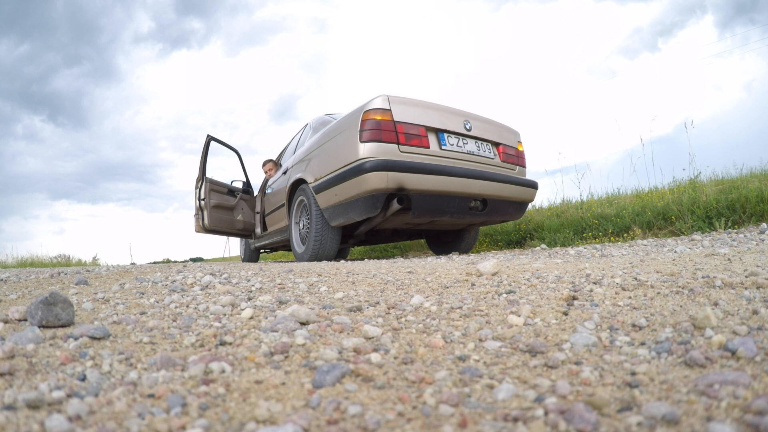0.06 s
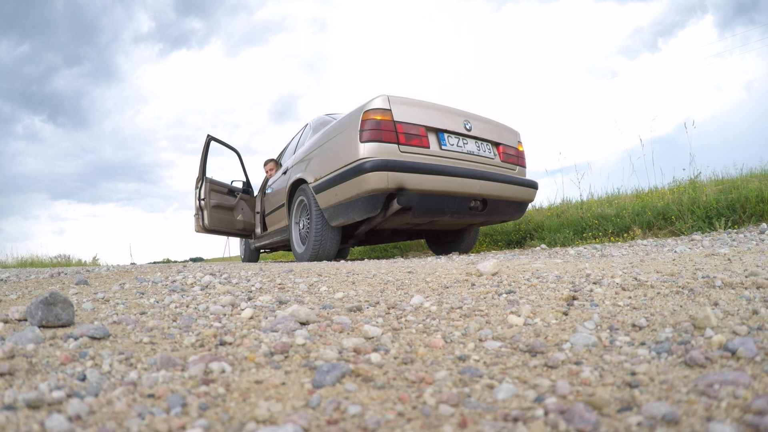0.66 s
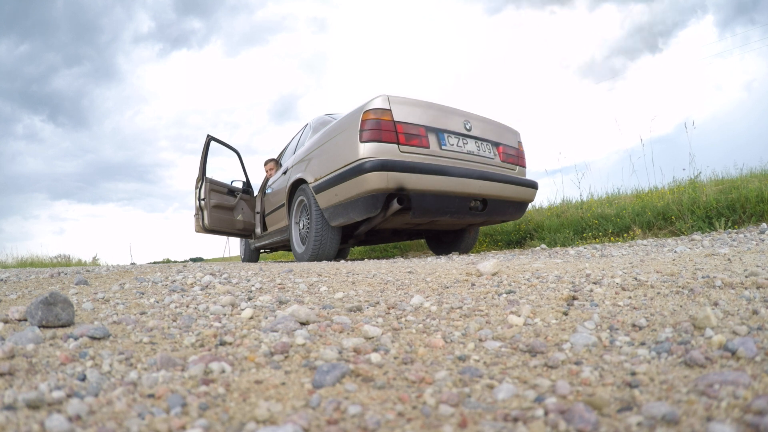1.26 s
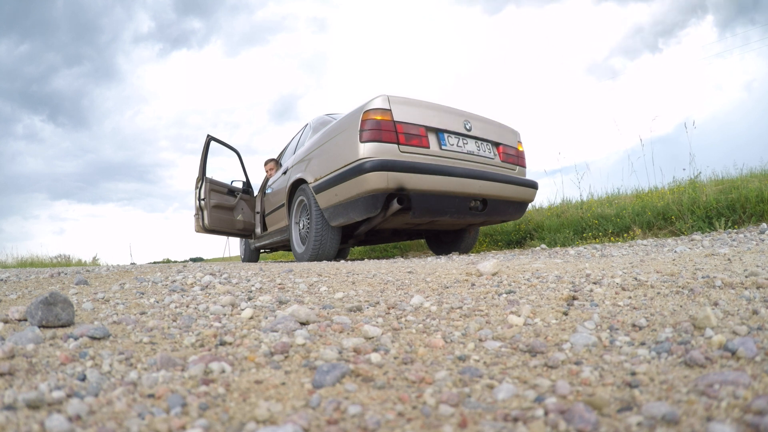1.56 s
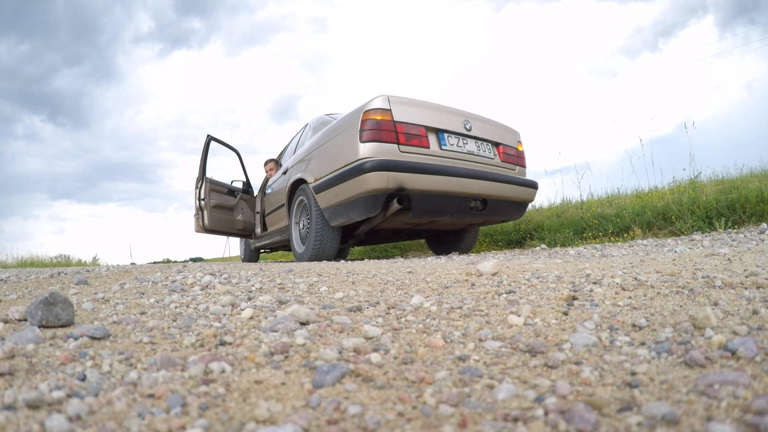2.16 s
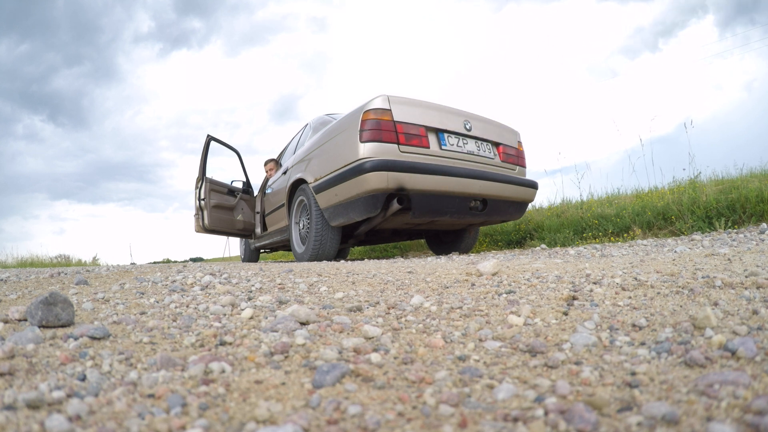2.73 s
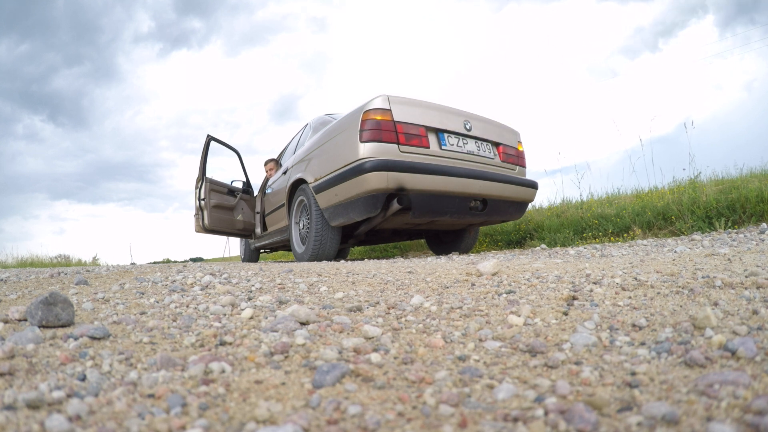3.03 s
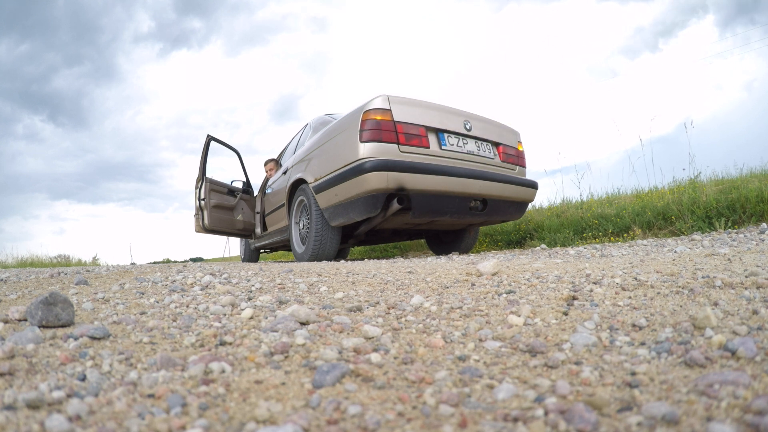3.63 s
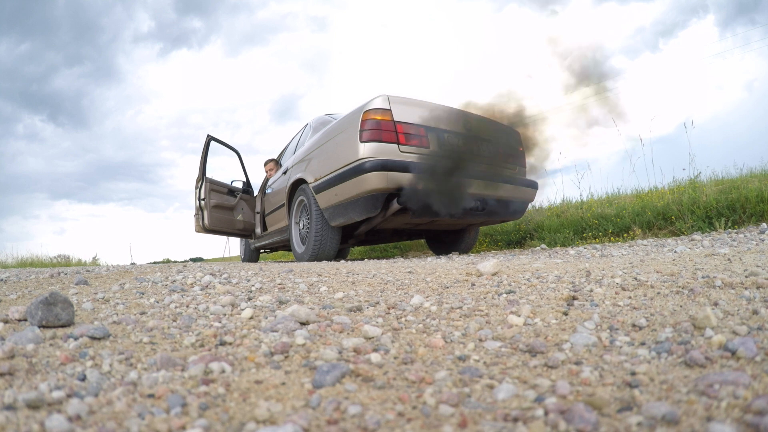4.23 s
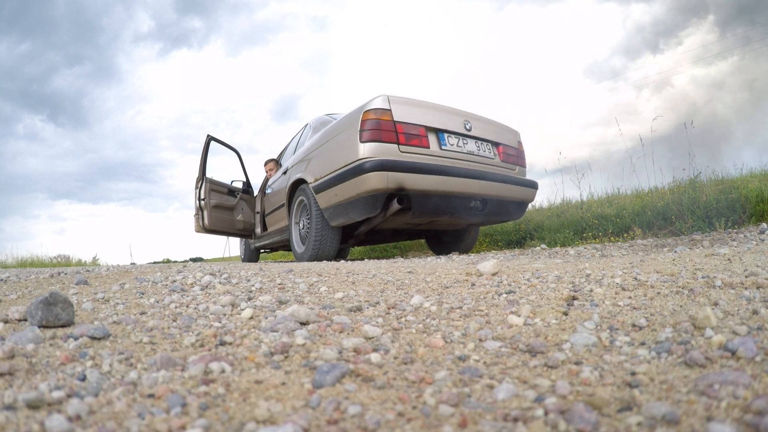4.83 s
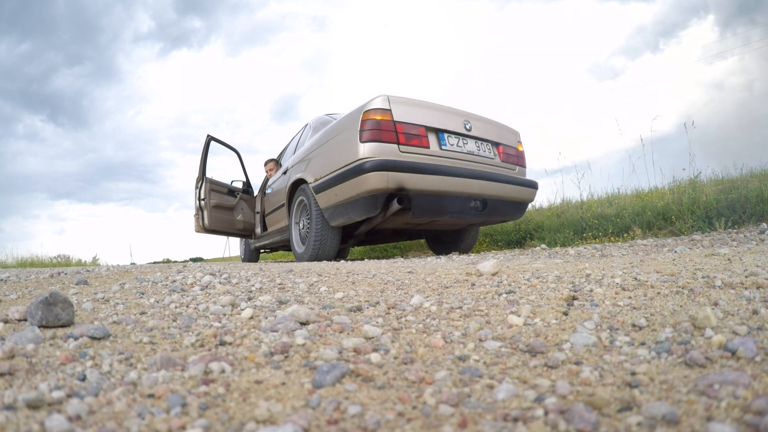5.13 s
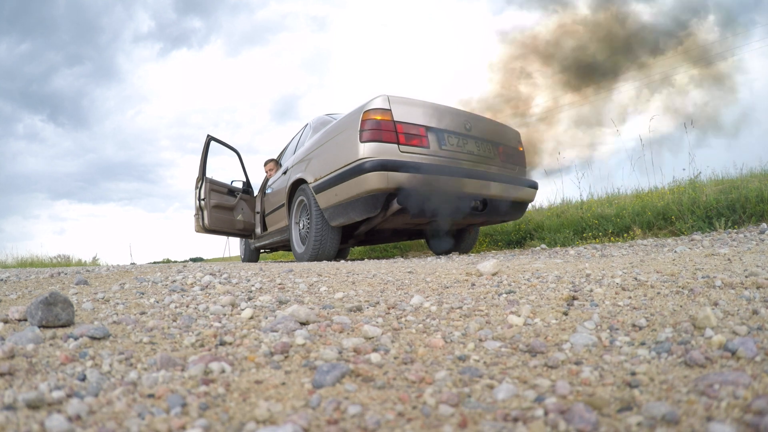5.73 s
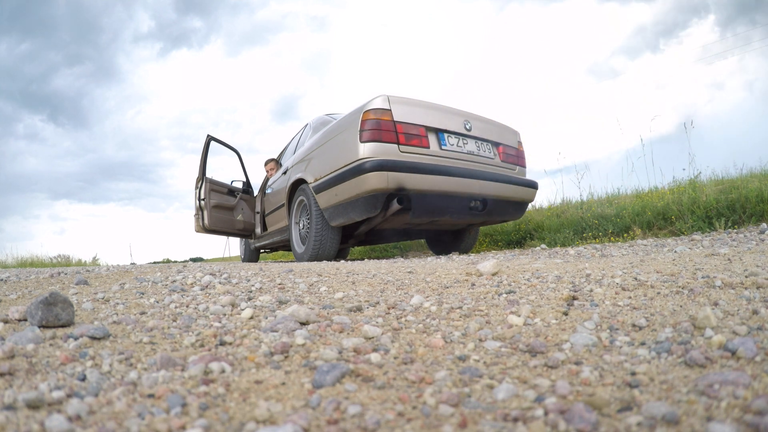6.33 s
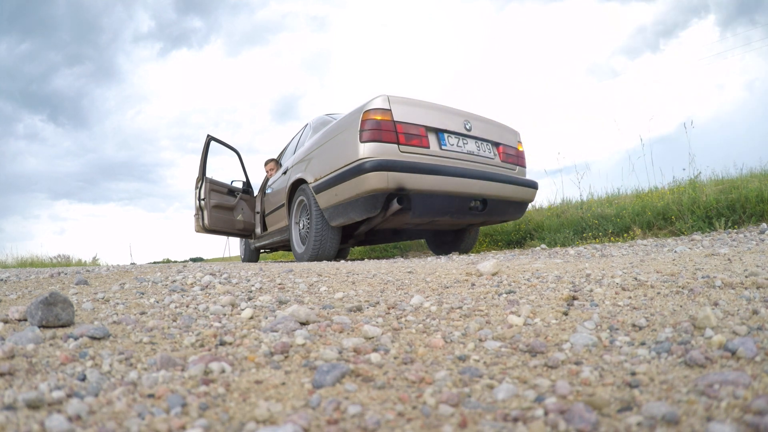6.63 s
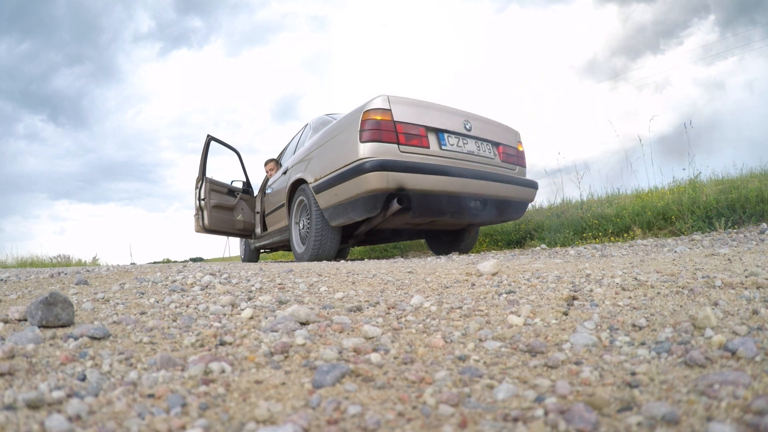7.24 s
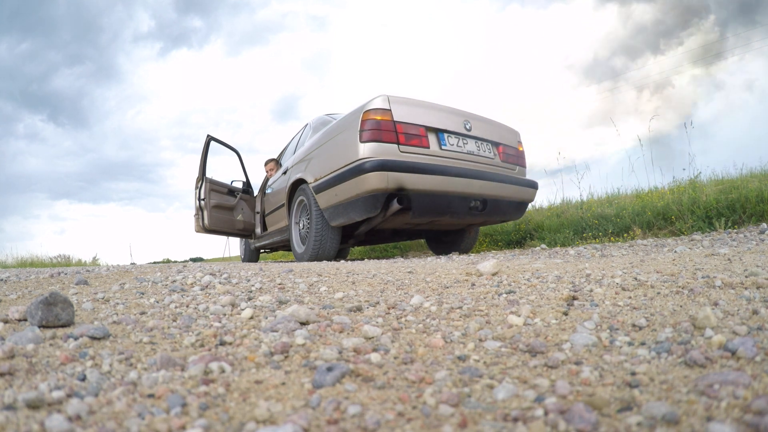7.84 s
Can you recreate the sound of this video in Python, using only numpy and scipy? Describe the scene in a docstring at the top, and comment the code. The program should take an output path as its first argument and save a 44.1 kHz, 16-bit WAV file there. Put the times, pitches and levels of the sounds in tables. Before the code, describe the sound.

A diesel car idles unevenly, then revs four times through an open exhaust with rough barks, ending in a loud backfire.

```python
"""A six-cylinder turbo diesel on a gravel track, heard from the ground behind its open tailpipe.
It idles slowly, each firing pushing out a slug of gas. At 0.5 s a throttle stab lifts it to a fast
idle, where the fuel drops out three times and two short kicks catch it. From 3.9 s it is blipped four
times: the firings bark under load; in between the pipe drones, gas rushes and the turbo whistles down.
At 7.8 s unburnt fuel backfires in the pipe and overloads the microphone."""
import sys
import numpy as np
from scipy import signal
from scipy.fft import rfft, irfft, next_fast_len
from scipy.io import wavfile
from scipy.ndimage import uniform_filter1d, map_coordinates

SR = 44100
rng = np.random.default_rng(int(sys.argv[2]) if len(sys.argv) > 2 else 0)


def dump(signal):
    """Clip the signal to [-1, 1] and save it as 16-bit WAV at the path in sys.argv[1]."""
    limited = np.clip(np.atleast_2d(signal).T, -1, 1)
    pcm = np.round(limited * 32767).astype(np.int16)
    wavfile.write(sys.argv[1], SR, pcm)


N = 356769
TIME = np.arange(N) / SR


# pipe weighting of the firing harmonics: f/Hz, level/dB
PIPE_RESPONSE = [(25, -26), (40, -2), (68, 5), (80, 4), (120, 5), (140, 0.5), (165, -3.5), (200, -17),
                 (240, -12), (285, -15), (330, -18.5), (420, -28.5), (700, -41)]

def exhaust_pulses(rate_hz, firings, lag=0.025, steepening_db=3.5, racing_db=1.0):
    """Each firing pushes out a slug of gas, then sucks back; revving steepens the pulse."""
    _, _, revving = regimes()
    angle = 2 * np.pi * (firings - .5 - lag)
    skew_rad = np.clip(rate_hz / 90 - .35, 0, 1)
    wave, power = 0, 0
    for k in range(1, 10):
        gain = from_db(at_hz(PIPE_RESPONSE, k * rate_hz) + (k > 1) * steepening_db * revving)
        wave = wave - gain * np.cos(k * angle + (k - 1) * skew_rad)
        power = power + gain ** 2 / 2
    radiation = from_db(racing_db * np.clip(rate_hz / 60 - 1, 0, 1))   # fast pulses radiate better
    strength = firing_strength(firings, imbalance=.4, scatter_db=.35)
    return pulse_pressure(rate_hz) * radiation * strength * wave / np.sqrt(power)


# pulses under load: firing rate/Hz, level/dB
LOADED_PULSES = [(45, -25), (62, -21.5), (80, -10.5), (108, -16), (125, -12.5), (145, -11.5)]
# fuel dropouts: t/s
FUEL_CUTS = [1.585, 2.68, 3.79]
# throttle kicks: t/s, pulse level/dB, rush dip/dB
KICKS = [(1.72, -15, 4), (2.83, -17, 3)]

def pulse_pressure(rate_hz, slow_db=-16, fast_db=-13, cut_db=21.5, dip_scale=1.6, kick_s=0.03):
    """Pulse strength follows the fuel: idling, starved, kicked or loaded."""
    slow, fast, _ = regimes()
    _, up_s, _, _, pulse_db, *_ = np.transpose(STABS)
    starved_db = cut_db * sum(step(t, 0.0066) * fade(t, 0.086) for t in FUEL_CUTS)
    held = step(up_s[0], kick_s) * from_db(fast_db - dip_scale * dip_db(recover_s=0.54) - starved_db)
    kicked = sum(from_db(db) * bell(t, kick_s) for t, db, _ in KICKS)
    loaded = from_db(at_hz(LOADED_PULSES, rate_hz)) * load(pulse_db, surge_db=6, release_s=0.035)
    return np.maximum(slow * from_db(slow_db) + fast * held + kicked, loaded)


# governed speed: t/s, firing rate/Hz
GOVERNOR = [(0, 41.04), (.46, 38.58), (.6, 64.6), (.69, 72.2), (1.25, 69.95), (1.7, 64.77), (1.77, 68.37),
            (2.45, 68), (2.81, 64.85), (2.88, 68.1), (3.62, 67.6), (3.91, 65.18), (5.4, 79.64)]
# throttle stabs: pedal down t/s, pedal up t/s, top firing rate/Hz, surge width/s,
# pulse level/dB, bark level/dB, crackle level/dB, rush dip/dB
STABS = [(0.486, 0.618, 68.3, 0.1, 5, -21, -38.5, 7.5), (3.928, 4.2799, 132.4, 0.06, -3.5, -20, -36.5, 3.5),
         (5.4161, 5.7472, 145.52, 0.068, -1, -19.5, -38.5, 3.5),
         (6.6644, 6.9085, 141.49, 0.061, -1, -19, -38.5, 3),
         (7.431, 7.6544, 157, 0.053, -1.5, -20.5, -39.5, 2.5)]

def firing_rate(climb_exponent=1.03, coast_s=1.9013):
    """Speed climbs while the pedal is down, then coasts until the governor catches it."""
    rate_hz = idle_hz = in_time(GOVERNOR)[0]
    for down, up, top_hz, *_ in STABS:
        start_hz = np.interp(down, TIME, rate_hz)
        progress = np.clip((TIME - down) / (up - down), 0, 1)
        climb_hz = start_hz + (top_hz - start_hz) * progress ** climb_exponent
        rate_hz = np.where(TIME > down, np.maximum(climb_hz * fade(up, coast_s), idle_hz), rate_hz)
    return rate_hz


def regimes():
    """Shares of slow idle (to the first stab), fast idle (to the second) and revving."""
    first, second = step(STABS[0][0], .02), step(STABS[1][0], .02)
    return 1 - first, first - second, second


def load(levels_db, surge_db, release_s, attack_s=0.0064, peak_s=0.074):
    """Gain under throttle; the first firings of a stab are the hardest."""
    gain = 0
    for (down, up, _, surge_s, *_), db in zip(STABS, levels_db):
        pedal = step(down, attack_s) * fade(up, release_s)
        gain = gain + pedal * from_db(db + surge_db * bell(down + peak_s, surge_s))
    return gain


def firing_strength(firings, imbalance, scatter_db):
    """Gain per firing: six unequal cylinders plus random scatter."""
    index = np.arange(1000)
    cylinders = np.array([0.67, -3.0, -0.7, 1.0, 0.57, -2.5])
    level_db = imbalance * cylinders[index % 6] + scatter_db * rng.standard_normal(len(index))
    return from_db(np.interp(firings, index + .5, level_db))


# bark, crackle and injector spectra: f/Hz, level/dB
BARK_SPECTRUM = [(90, -27.5), (200, 2.5), (280, -2.5), (400, -0.5), (550, 0.5), (1040, -2), (1600, -5.5),
                 (2800, -13), (4000, -22), (5500, -28.5), (9000, -63)]
CRACKLE_SPECTRUM = [(1500, -16), (3000, 0.5), (4000, -4), (5100, -11), (6300, -23.5), (8800, -32),
                    (11600, -35.5), (15500, -58)]
TICK_SPECTRUM = [(4000, -26.5), (7000, 2), (10000, -7.5), (13000, -8), (15500, -13.5)]

def bark(rate_hz, firings, lead_s=0.00471, idle_bark_db=-46, idle_crackle_db=-56):
    """Loaded firings tear the air at each pressure crest; at slow idle they clatter, injectors tick."""
    crest = firings + lead_s * rate_hz
    age = (crest % 1 - .5) / rate_hz * np.sqrt(rate_hz / 90)   # bursts shorten with speed
    tear = burst(age, 0.00083, 0.002)
    slow, _, _ = regimes()
    *_, bark_db, crackle_db, _ = np.transpose(STABS)
    bark_gain = load(bark_db, surge_db=4, release_s=0.016) + slow * from_db(idle_bark_db)
    crackle_gain = load(crackle_db, surge_db=9.5, release_s=0.016) + slow * from_db(idle_crackle_db)
    tick_gain = from_db(-67) * (40 / rate_hz) ** 4

    def uneven(shape, scatter_db):
        """Bursts of uneven strength, mean power 1."""
        shape = shape * firing_strength(crest, imbalance=0.07, scatter_db=scatter_db)
        return shape / np.sqrt(uniform_filter1d(shape ** 2, SR // 12))

    body = uneven(tear + 0.13, scatter_db=1.5) * noise(BARK_SPECTRUM)
    crackle = uneven(tear ** 0.52 + 0.041, scatter_db=6) * noise(CRACKLE_SPECTRUM, grain_db=6)
    ticks = uneven(tear + .1, scatter_db=0.5) * noise(TICK_SPECTRUM)
    return bark_gain * body + crackle_gain * crackle + tick_gain * ticks


# hard firings: t/s, crack level/dB, puff level/dB, treble snap level/dB
HARD_FIRINGS = [(0.4833, -6, -3, -30), (0.508, -8, -18, -22), (0.528, -20, -30, -19),
                (1.708, -14, -23, -35), (1.721, -3.5, -1, -16), (1.734, -14, -7.5, -25),
                (2.8189, -6.5, -1, -33), (2.832, -5.5, -12, -32), (3.916, -8, -4.5, -39),
                (3.932, -16, -3.5, -35), (3.959, -8.5, -4.5, -11.5), (4.035, -31, -27, -13),
                (5.361, -16, -24, -42), (5.4101, -17, -5, -40), (5.522, -16, -30, -21),
                (5.606, -14, -30, -34), (6.675, -20, -6.5, -39), (6.704, -5.5, -11, -27),
                (7.44, -23, -10, -40), (7.474, -6, -24, -14)]
# crack spectrum: f/Hz, level/dB
CRACK_SPECTRUM = [(100, -11), (300, 9.5), (1200, 8), (2800, -2), (4500, -15.5), (7000, -33.5),
                  (15000, -52)]

def hard_firings(rise_s=0.00071, decay_s=0.0014, tail_db=-13, tail_s=0.019, puff_s=0.0018):
    """As the fuel comes in, a crack with a rough tail rides on one push and pull of gas."""
    cracks, puffs, snaps = np.zeros((3, N))
    for t, crack_db, puff_db, snap_db in HARD_FIRINGS:
        near = np.abs(TIME - t) < .08
        age = TIME[near] - t
        hit = burst(age, rise_s, decay_s)
        tail = from_db(tail_db) * burst(age, rise_s, tail_s)
        cracks[near] += from_db(crack_db) * (hit + tail)
        snaps[near] += from_db(snap_db) * hit
        swing = age / puff_s - 1
        puffs[near] -= from_db(puff_db) * swing * np.exp((1 - swing ** 2) / 2)
    return puffs + snaps * noise(CRACKLE_SPECTRUM) + cracks * noise(CRACK_SPECTRUM)


BACKFIRE_S = 7.7985
# bang spectrum: f/Hz, level/dB
BANG_SPECTRUM = [(100, -14), (800, 12.5), (2000, 3.5), (3000, 7.5), (5000, -4.5), (8000, -34),
                 (10500, -24), (15000, -33)]

def backfire(shock_s=0.0012, snap_at_s=0.0057, push_at_s=0.0066, pull_at_s=0.0076):
    """Unburnt fuel goes off in the pipe: a crack, a pressure wave, a deep suck behind it."""
    age = TIME - BACKFIRE_S
    shock = from_db(12.5) * (age > 0) * np.exp(-np.abs(age) / shock_s)
    snap = from_db(3) * np.exp(-.5 * ((age - snap_at_s) / 0.00031) ** 2)
    crack = (shock + snap) * noise(BANG_SPECTRUM)
    push = from_db(4) * np.exp(-.5 * ((age - push_at_s) / 0.00078) ** 2)
    pull = from_db(7) * (age > pull_at_s) * np.exp(-np.abs(age - pull_at_s) / .008)
    wave = push - cut(pull, 320, "low")
    return crack + cut(wave, 30, "high")


# silencer response: f/Hz, level/dB
SILENCER = [(60, -14.5), (110, -0.5), (180, 0.5), (230, -1), (300, -8.5), (400, -11), (520, -11.5),
            (700, -1)]

def burble(rate_hz, firings, rush_db, offset_db=-3, waver_db=5, revving_db=-9.5):
    """Unequal cylinders add lines between the firing harmonics, shaped by the silencer."""
    _, _, revving = regimes()
    lines = 0
    for thirds in (4, 5, 7, 8, 10, 11, 13, 16, 20):
        order = thirds / 3
        line_db = at_hz(SILENCER, rate_hz * order) + waver_db * drift(7) - 5 * (thirds % 2)
        lines = lines + from_db(line_db) * np.sin(2 * np.pi * (firings * order + rng.random()))
    return from_db(rush_db + offset_db + revving_db * revving) * lines


# run-down drone: firing rate/Hz, then level/dB at 2/3, 1, 2 and 3 times that rate
DRONE_ORDERS = [(81, -33, -29.5, -23, -30), (88, -39, -38, -29, -30), (100, -32.5, -42, -50, -39),
                (112, -33.5, -32.5, -56, -40), (125.5, -39.5, -34, -59, -45), (145, -46, -46.5, -48, -54.5)]

def drone(rate_hz, firings, waver_db=2, dip_scale=0.3):
    """Throttle shut: engine orders swell and fade with engine speed as it runs down."""
    rates_hz, *levels_db = np.transpose(DRONE_ORDERS)
    _, _, revving = regimes()
    pedal = sum(step(down, 0.037) - step(up, 0.037) for down, up, *_ in STABS[1:])
    shut = np.clip(revving - pedal, 0, 1)
    tones = 0
    for order, curve_db in zip((2 / 3, 1, 2, 3), levels_db):
        level_db = np.interp(rate_hz, rates_hz, curve_db) + waver_db * drift(14)
        tones = tones + from_db(level_db) * np.sqrt(2) * np.sin(2 * np.pi * order * firings)
    return shut * from_db(-dip_scale * dip_db()) * tones


# rush, hiss and rumble spectra: f/Hz, level/dB
RUSH_SPECTRUM = [(60, -15), (130, 1), (200, -9.5), (300, 1.5), (400, -5.5), (520, -4.5), (700, -6.5),
                 (1040, -4), (1730, -8), (3030, -18.5), (4000, -37), (6000, -63.5)]
HISS_SPECTRUM = [(2000, -22.5), (3400, 0.5), (3900, -4.5), (4400, -4.5), (5400, -6.5), (6500, -13.5),
                 (7500, -21.5), (10000, -28), (13500, -35.5), (15500, -51.5)]
RUMBLE_SPECTRUM = [(10, -18), (25, 0.5), (60, -1.5), (130, -1.5), (200, -3), (280, -21.5), (600, -57)]

def gas_flow(firings, rush_db, throb_depth=0.082, flutter_db=1, lull_db=1.5, lull_s=0.074):
    """Gas rushes through the pipe, throbbing with the firings; the hiss lulls after each blip."""
    _, _, revving = regimes()
    lull = sum(bell(up + lull_s, lull_s) for _, up, *_ in STABS[1:])
    hiss_db = rush_db - 19.5 + 3 * revving - lull_db * lull
    throb = 1 + throb_depth * np.cos(2 * np.pi * (firings - .25))
    flutter = from_db(flutter_db * drift(90))
    rush = from_db(rush_db + 3) * through_pipe(noise(RUSH_SPECTRUM))
    hiss = from_db(hiss_db) * through_pipe(noise(HISS_SPECTRUM))
    rumble = from_db(rush_db - 10) * noise(RUMBLE_SPECTRUM)
    return throb * flutter * (rush + hiss) + rumble


# pipe resonances: f/Hz, width/Hz, lift/dB
PIPE_MODES = [(293.4, 27, 4.5), (535, 69, 8), (804, 8.5, 8), (998, 34, 6.5), (1436, 110, 2),
              (2275, 120, 3.5), (3064, 400, 5), (4370, 200, 6.5), (5420, 200, 4), (6100, 90, -2.5),
              (8130, 250, 0), (10100, 570, 2.5)]

def through_pipe(flow):
    """Pipe resonances colour the flow; rms 1."""
    for hz, width_hz, lift_db in PIPE_MODES:
        radius = np.exp(-np.pi * width_hz / SR)
        poles = [1, -2 * radius * np.cos(2 * np.pi * hz / SR), radius ** 2]
        band = signal.lfilter([1, 0, -1], poles, flow) * (1 - radius ** 2) / 2
        flow = flow + (from_db(lift_db) - 1) * band
    return rms_one(flow)


def rush_level_db(slow_db=-35, running_db=-27.5):
    """Base level of flow and burble: low at slow idle, then steady but for the dips."""
    slow, _, _ = regimes()
    return slow * slow_db + (1 - slow) * running_db - dip_db()


def dip_db(recover_s=0.73, backfire_dip_db=11.5):
    """The level sinks after each stab, kick and bang, then swells back."""
    dips = [(up, db) for _, up, *_, db in STABS] + [(t, db) for t, _, db in KICKS]
    dips.append((BACKFIRE_S, backfire_dip_db))
    return np.max([db * step(t, .015) * bell(t, recover_s) for t, db in dips], axis=0)


# whistle at idle: t/s, f/Hz, level/dB
IDLE_WHISTLE = [(0, 5540, -59), (.47, 4860, -62), (.58, 4960, -50), (.68, 6400, -61), (.9, 6740, -75),
                (1.2, 7030, -57), (1.66, 7080, -59.5), (1.8, 7370, -58), (2.05, 7240, -74),
                (2.76, 7150, -63), (2.92, 7500, -60), (3.2, 7300, -69), (3.93, 7140, -65)]
# spool-downs: start t/s, end t/s, start f/Hz, end f/Hz
SPOOL_DOWNS = [(4.35, 5.415, 14700, 10100), (6.15, 6.68, 15730, 12400), (7.3, 7.45, 15400, 14300)]
# whistle while spooling down: f/Hz, level/dB
SPOOL_WHISTLE = [(10200, -76), (12000, -70), (13000, -80), (15000, -84)]

def turbo(half_width_hz=130):
    """The turbine's breathy whistle follows its shaft: wandering at idle, falling between blips."""
    hz, idle_db = in_time(IDLE_WHISTLE)
    _, _, revving = regimes()
    gain = from_db(idle_db) * (1 - revving)
    for start, end, start_hz, end_hz in SPOOL_DOWNS:
        spooling = (TIME > start) & (TIME < end)
        hz = np.where(spooling, np.interp(TIME, [start, end], [start_hz, end_hz]), hz)
        gain = np.where(spooling, from_db(at_hz(SPOOL_WHISTLE, hz)), gain)
    angle = 2 * np.pi * np.cumsum(hz) / SR
    in_phase, quadrature = cut(rng.standard_normal((2, N)), half_width_hz, "low")
    return gain * rms_one(in_phase * np.cos(angle) + quadrature * np.sin(angle))


# airy hiss spectrum: f/Hz, level/dB
AIR_SPECTRUM = [(3000, -19), (5300, 5.5), (6800, -0.5), (7600, -13), (8200, -9), (9000, -14),
                (10100, -7.5), (11500, -23), (15500, -40)]

def coasting_air(level_db=-59, wait_s=.17, swell_s=.06):
    """Between blips an airy hiss swells and lasts until the pedal goes down again."""
    gate = sum(step(up + wait_s, swell_s) * (1 - step(next_down, swell_s))
               for (_, up, *_), (next_down, *_) in zip(STABS[1:], STABS[2:]))
    return from_db(level_db) * gate * noise(AIR_SPECTRUM)


def noise(spectrum, grain_db=0):
    """Turbulence of a given spectral shape, rms 1; grain makes it spiky."""
    size = next_fast_len(N, True)
    white = rng.standard_normal(size) * from_db(grain_db * np.clip(rng.standard_normal(size), -3, 3))
    hz = np.maximum(np.fft.rfftfreq(size, 1 / SR), 1)
    return rms_one(irfft(rfft(white) * from_db(at_hz(spectrum, hz)))[:N])


def drift(rate_hz):
    """Smooth random wander, rms 1."""
    points, coarse_s = rng.standard_normal(N // 100), TIME[::20]
    curve = map_coordinates(points, [coarse_s * rate_hz + 5], order=3, mode="wrap")
    return rms_one(np.interp(TIME, coarse_s, curve))


def burst(age, rise_s, decay_s):
    """Gaussian rise to age 0, exponential decay after."""
    return np.where(age < 0, np.exp(-.5 * (age / rise_s) ** 2), np.exp(-np.abs(age) / decay_s))


def step(t, rise_s):
    """Smooth 0 to 1 around t."""
    return .5 + .5 * np.tanh((TIME - t) / rise_s)


def bell(t, width_s):
    """Swell and fall around t."""
    return np.exp(-np.minimum(((TIME - t) / width_s) ** 2, 20))


def fade(t, decay_s):
    """1 until t, then decaying."""
    return np.exp(-np.clip((TIME - t) / decay_s, 0, 20))


def in_time(rows):
    """Table columns, sample by sample."""
    times, *columns = np.transpose(rows)
    return [np.interp(TIME, times, column) for column in columns]


def at_hz(spectrum, hz):
    """Level in dB, interpolated over log frequency."""
    points_hz, levels_db = np.transpose(spectrum)
    return np.interp(np.log(hz), np.log(points_hz), levels_db)


def cut(x, hz, kind):
    """Second-order low- or high-pass."""
    return signal.sosfilt(signal.butter(2, hz, kind, fs=SR, output="sos"), x + 1e-18)


def from_db(db):
    return 10 ** (np.asarray(db) / 20)


def rms_one(x):
    return x / np.sqrt(np.mean(x ** 2) + 1e-20)


def scene():
    """Engine, gas flow, turbo and backfire at one microphone."""
    rate_hz, rush_db = firing_rate(), rush_level_db()
    firings = np.cumsum(rate_hz) / SR   # running count
    tones = exhaust_pulses(rate_hz, firings) + burble(rate_hz, firings, rush_db) + drone(rate_hz, firings)
    engine = tones + bark(rate_hz, firings) + hard_firings()
    return (engine + gas_flow(firings, rush_db) + turbo() + backfire() + coasting_air())[None]


def record(dry, ceiling=0.98, cutoff_hz=15900):
    """The microphone flattens the biggest peaks; the top treble is cut."""
    clipped = dry / (1 + (dry / ceiling) ** 8) ** (1 / 8)
    return signal.sosfilt(signal.ellip(10, .1, 80, cutoff_hz, fs=SR, output="sos"), clipped)


dry = scene()
out = record(dry)
dump(out)
```